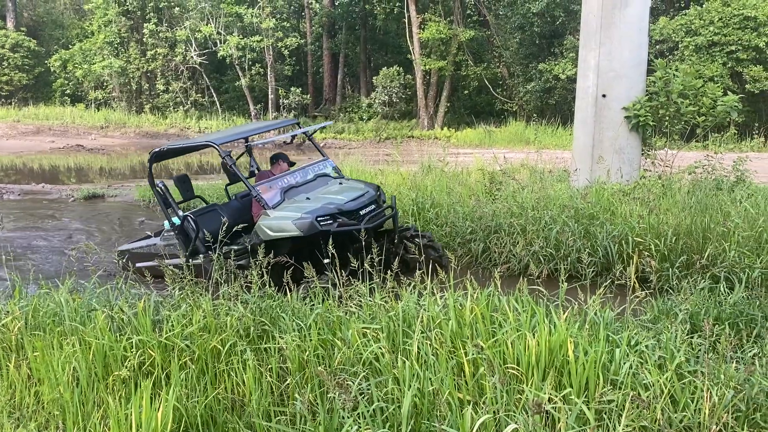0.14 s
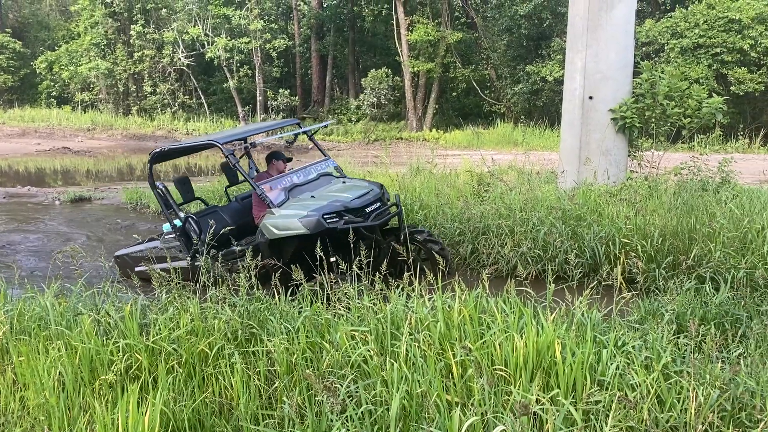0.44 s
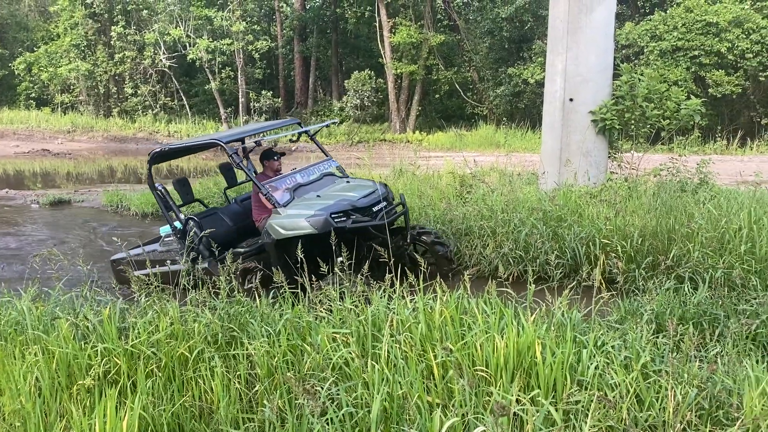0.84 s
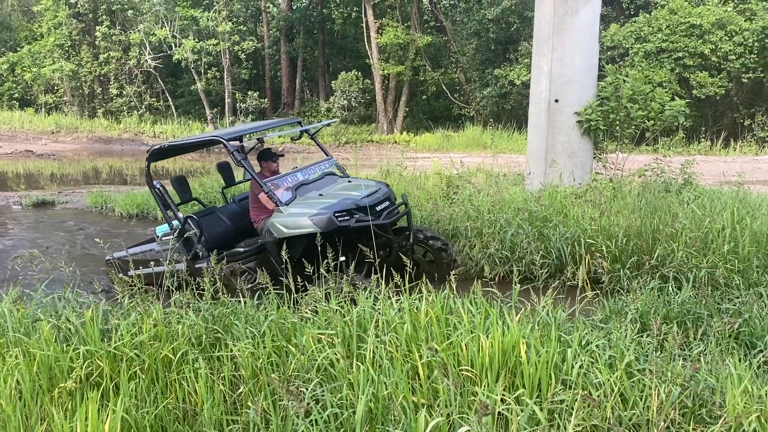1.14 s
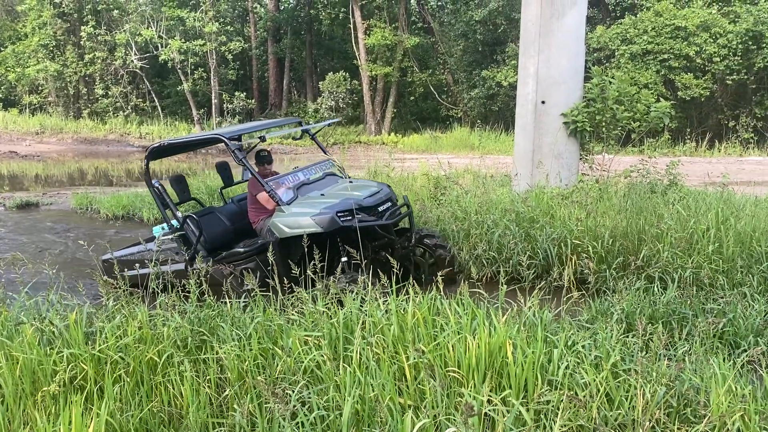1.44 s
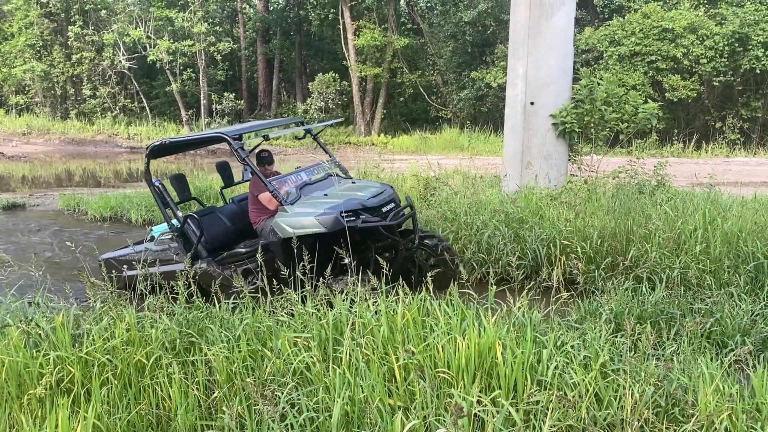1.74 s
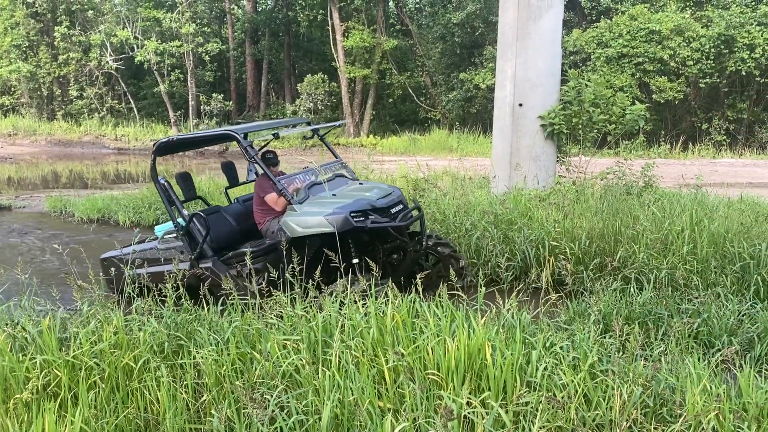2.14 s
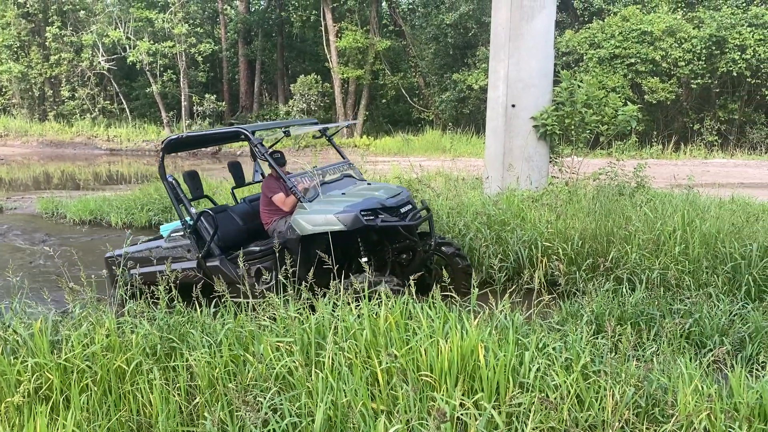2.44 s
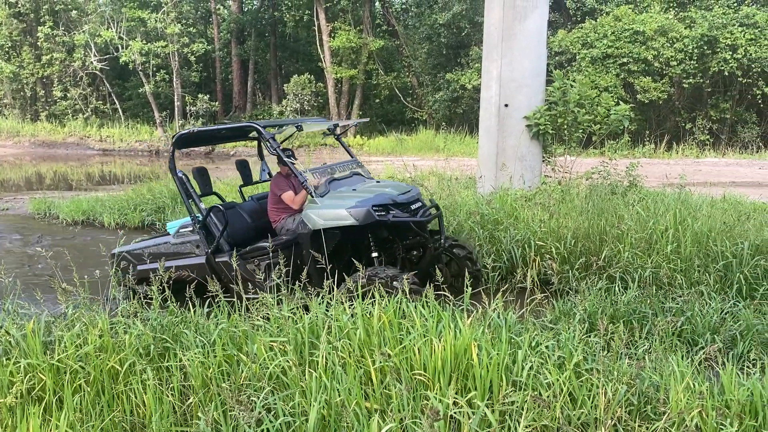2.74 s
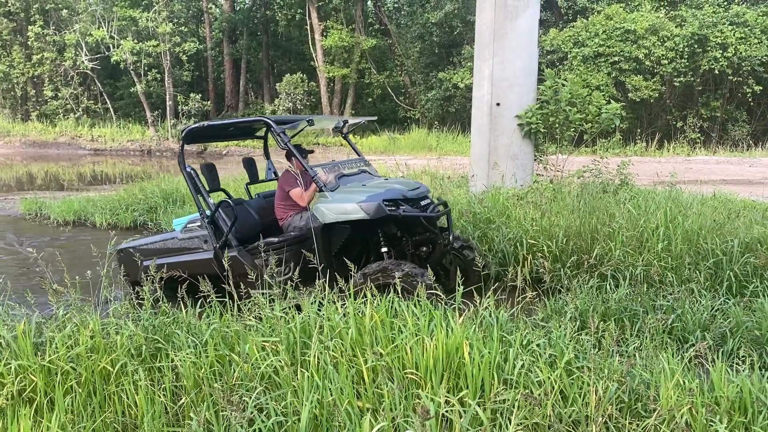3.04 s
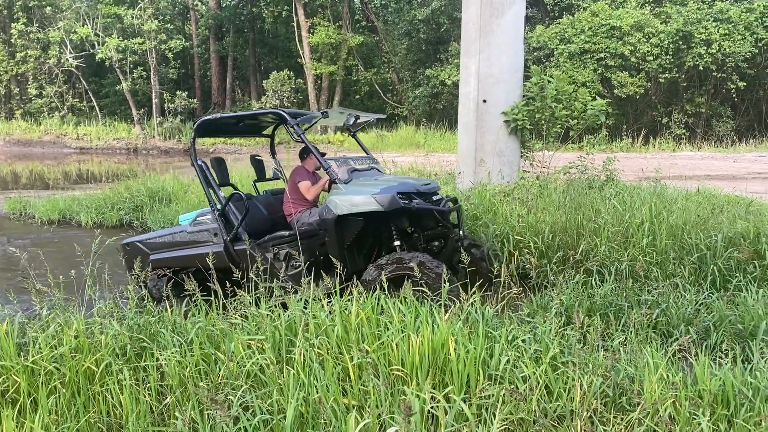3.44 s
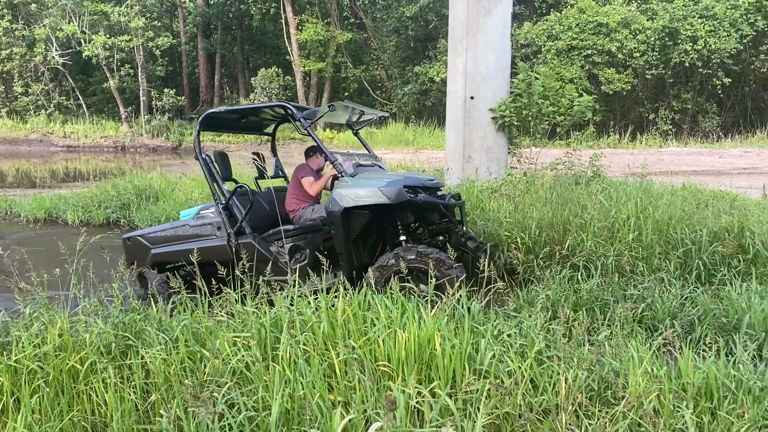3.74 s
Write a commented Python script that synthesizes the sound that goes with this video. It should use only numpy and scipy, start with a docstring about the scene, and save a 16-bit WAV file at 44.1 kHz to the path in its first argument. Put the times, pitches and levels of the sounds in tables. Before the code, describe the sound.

Off-road buggy engine chugging and bubbling through a muddy pool, its exhaust breaking into loud rapid pops

```python
"""Low glugs and gulps come first, over engine hum and churned water: an exhaust bubbling under a muddy pool.
A small utility vehicle climbs out, a few metres from a two-port microphone. Loud pops break free and crowd
together later, while noise and gear whine grow and the frame knocks. Bubbles and knocks are decaying rings,
pops are short bursts of pitch and rasp, the hum is multiples of the firing rate, and the rest is shaped noise."""
import sys
import numpy as np
from scipy import signal
from scipy.fft import rfft, irfft
from scipy.io import wavfile
from scipy.ndimage import uniform_filter1d

SR = 44100
rng = np.random.default_rng(int(sys.argv[2]) if len(sys.argv) > 2 else 0)


def unload_wav(signal):
    """Save mono or channel-first audio to the path in sys.argv[1] as 16-bit WAV at rate SR, clipped to [-1, 1]."""
    wavfile.write(
        sys.argv[1],
        SR,
        np.round(np.clip(np.atleast_2d(signal).T, -1, 1) * 32767).astype(np.int16),
    )


N = 171990  # length in samples

# Engine firing rate. Each row: time [s], firings per second [Hz].
FIRING_RATE = [(0, 28.2), (.6, 29.0), (1.4, 29.55), (1.7, 29.95), (2.3, 29.82), (2.85, 29.12), (3.5, 29.68),
               (3.9, 30.05)]

# Engine and water noise as the vehicle nears. Each row: time [s], roar, rattle and hiss [dB rms].
NOISE_LEVELS = [(0, -33, -41.5, -48), (1.2, -29, -39, -44.5), (2.2, -28, -35, -40.5),
                (2.9, -26.5, -36, -41.5), (3.5, -24.5, -31.5, -37), (3.9, -22.5, -31, -35.5)]
# Edges of roar, rattle and hiss. Each row: low edge [Hz], high edge [Hz].
NOISE_BANDS = [(250, 1600), (1600, 4500), (4500, 16000)]
# Part of each noise band that puffs with the firings. Each row: share at the start, share at the end [0 to 1].
PUFF_SHARES = [(0.033, 0.45), (0.15, 0.21), (0.024, 0.33)]
# Noise colour low in the pool. Each row: frequency [Hz], relative density [dB per Hz].
POOL_COLOUR = [(150, -29), (250, -0.5), (329, -14), (487, -10), (870, -10.5), (1130, -20), (1380, -13.5),
               (1670, -19.5), (2110, -19), (2370, -27.5), (4410, -28), (8000, -31)]
# Noise colour up on the bank. Each row: frequency [Hz], relative density [dB per Hz].
BANK_COLOUR = [(150, -30), (250, -12), (392, -9), (524, -12.5), (597, -14), (731, -12), (1070, -17),
               (1850, -18.5), (2080, -18.5), (2330, -22), (4410, -26.5), (8000, -28)]
# Panel resonances in the noise. Each row: frequency [Hz], width [Hz], boost [dB].
PANEL_RESONANCES = [(2586, 300, 5), (3184, 260, 4), (4670, 490, 5)]
TREBLE_DB_PER_OCTAVE = -9  # above 8 kHz
PUFF_RISE_S, PUFF_FALL_S, PUFF_SIZE_DB = 0.0058, 0.011, 2.5
PATCH_DB, FLICKER_DB = 1, 1  # rms unevenness over time and pitch, and of each band's level

# Low hum of the engine block. Each row: multiple of the firing rate, level [dB rms].
HUM_MULTIPLES = [(1, -30.5), (2, -27), (3, -24.5), (4, -31.5), (5, -33), (6, -36), (7, -36.5)]
# Swell of the third multiple, as one row: time to full level [s], starting offset [dB].
THIRD_SWELL = (2, -6)
# Upper engine tones. Each row: time [s], levels at 9, 15 and 18 times the firing rate [dB rms].
UPPER_TONES = [(0, -38.5, -73, -68), (.5, -34.5, -49, -40), (1.2, -28, -41, -40.5),
               (2.2, -31.5, -36.5, -35.5), (2.7, -37, -35, -34), (3.9, -29.5, -34.5, -42.5)]
HUM_WAVER_DB, TONE_WAVER_DB, TONE_WOBBLE_TURNS = 2.5, 2, .005

# Ring of the valve gear. Each row: pitch [Hz], level [dB], t60 [s], change over the scene [dB per s].
VALVE_RINGS = [(721, -28, 0.077, -0.5), (854, -28.5, 0.069, -7.5), (989, -24.5, 0.083, -12.5),
               (1337, -41.5, 0.11, -2.5), (2564, -37.5, 0.1, -6.5)]
VALVE_SIZE_DB = 0.5  # spread between ticks

# Gear whine. Each row: time [s], level [dB rms over a steady whine].
WHINE_LEVELS = [(0, -51), (1.1, -52.5), (2.6, -41.5), (3.3, -34.5), (3.6, -38.5), (3.8, -33.5)]
# The two whistles. Each row: pitch [Hz], width of each resonator stage [Hz], relative level [dB].
WHISTLES = [(2020, 44, -6.5), (2088, 39, -5)]
WHINE_STEADY, WHINE_KICK_S, WHINE_SIZE_DB = .8, .014, 3  # steady part beside kicks of rms 1

# Knocks in the frame. Each row: start [s], peak [dB], brightness [dB per octave about 1 kHz].
FRAME_KNOCKS = [(0.224, -25, 14), (1.576, -16.5, -20), (1.884, -16, -6), (2.27, -9.5, 0),
                (2.279, -10.5, -12), (2.287, -12, -11), (2.345, -17, -5), (2.824, -16, -3),
                (3.028, -17.5, -12), (3.166, -11.5, -3), (3.502, -12, 0), (3.676, -17, -1),
                (3.771, -11.5, -4)]
# Ringing modes of the frame. Each row: pitch [Hz], relative level [dB], t60 [s].
FRAME_MODES = [(690, 8.5, 0.036), (759, 5.5, 0.04), (1010, 16.5, 0.0089), (1353, 8, 0.026),
               (1418, 1.5, 0.029), (1620, 9.5, 0.016), (2127, 1.5, 0.064)]

# Exhaust glugging under water. Each row: time [s], level [dB rms].
GLUG_LEVELS = [(0, -28), (2.3, -26), (3.9, -33)]
# Big gulps of gas. Each row: start [s], peak [dB], starting pitch [Hz].
BIG_GULPS = [(0.114, -11.5, 76), (0.281, -35, 75), (0.463, -10, 72.4), (0.518, -14, 99),
             (0.619, -11, 107.5), (0.765, -14, 114.7), (0.864, -12, 102), (1.045, -18, 79),
             (1.24, -14, 114), (1.393, -12, 89), (1.508, -15, 101), (1.656, -11, 77.2),
             (1.907, -13.5, 116.6), (1.978, -21, 96.9), (2.149, -13, 76.5)]
GLUG_HZ, GLUG_SPREAD, GLUG_SIZE_DB = 85.2, 0.3, 2  # pitch spread in natural-log units
GLUG_RISE_S, GLUG_T60_S, GLUG_GLIDE_PER_S = 0.013, 0.14, 3
GULP_RISE_S, GULP_T60_S, GULP_GLIDE_PER_S = .013, .15, 6

# Small exhaust pops. Each row: time [s], level [dB rms].
SMALL_POP_LEVELS = [(0, -37), (.6, -32.5), (1.5, -35.5), (2.1, -34.5), (2.6, -29), (3.9, -26)]
# Loud exhaust pops. Each row: time before POP_LAG_S [s], approximate peak [dB], pitch [Hz].
LOUD_POPS = [(0.898, -12, 184), (1.133, -15, 186), (1.445, -11, 204), (1.474, -10.5, 323),
             (1.506, -13, 358), (1.542, -12, 173), (1.673, -10.5, 178), (1.708, -9.5, 188),
             (2.042, -18, 164), (2.243, -13, 276), (2.276, -12, 283), (2.31, -12, 220), (2.343, -10.5, 355),
             (2.648, -13.5, 189), (2.715, -12.5, 177), (2.75, -10.5, 179), (2.817, -15, 226),
             (2.854, -11, 175), (2.887, -8.5, 296), (2.918, -11, 169), (2.956, -9.5, 275),
             (2.993, -13, 150), (3.059, -14, 203), (3.125, -7.5, 189), (3.161, -10.5, 210),
             (3.23, -10.5, 161.5), (3.265, -6.5, 175), (3.334, -7.5, 169.5), (3.365, -11.5, 170),
             (3.399, -8.5, 161), (3.468, -5, 183), (3.501, -5, 406), (3.532, -8, 312), (3.569, -7.5, 227),
             (3.633, -15.5, 187), (3.671, -10.5, 180), (3.734, -10.5, 290), (3.769, -8, 176),
             (3.802, -14, 158), (3.836, -6, 180)]
# The rasp grows once the pops are clear of the water, as one row: early and final share of POP_RASP.
RASP_GROWTH = (.1, .55)
POP_HZ = (138, 248)  # centre at start and end: pitch rises as the pipe nears the surface
POP_SPREAD, POP_SIZE_DB = .3, 2  # pitch spread in natural-log units
POP_CYCLES, POP_GLIDE, POP_LEAN = .7, -0.15, 1.3  # cycles per envelope width, pitch slide, phase [rad]
POP_LAG_S, POP_RASP = 0.005, 0.55

# Likeness of left and right ports. Each row: frequency [Hz], share [0 to 1].
PORT_LIKENESS = [(60, 0.99), (1000, 0.99), (2000, 0.97), (4000, 0.3), (8000, 1), (15000, 1)]
# Phase by which left leads right. Each row: frequency [Hz], lead [rad].
PORT_LEAD = [(0, 0), (2240, 1.4), (5680, -.5), (7240, 0), (8440, -2.8), (9560, -3.4), (10500, -6),
             (11600, -6.4), (12500, -9.1), (13700, -9.5), (14600, -12.3), (16600, -12.8)]
# Level of left minus right. Each row: frequency [Hz], difference [dB].
PORT_TILT = [(60, -.8), (700, -1), (1800, -3), (2800, 3.5), (4200, 4.5), (9000, 0)]
LOW_CUT_HZ, EDGE_HZ = 55.8, 15850


def amp(db):
    """Decibels to amplitude."""
    return 10 ** (np.asarray(db) / 20)


def evened(x):
    """Scale to rms 1."""
    return x / np.sqrt(np.mean(x ** 2) + 1e-20)


def read(points, hz):
    """Read a frequency table along a logarithmic axis."""
    f, value = np.transpose(points)
    return np.interp(np.log(hz + 1), np.log(f + 1), value)


def curve(table, axis):
    """One column of a time table at every sample."""
    return np.interp(np.arange(N) / SR, np.transpose(table)[0], np.transpose(table)[axis])


def add(mix, s, sound):
    """Lay a sound into the mix from s seconds."""
    part = mix[max(round(s * SR), 0):][:len(sound)]
    part += sound[:len(part)]


def waver(rate_hz):
    """Slow chance of rms 1: twenty sines from 0.5 Hz up to rate_hz."""
    t = np.arange(0, N + 64, 64) / SR
    rates = np.geomspace(.5, rate_hz, num=20)
    slow = sum(np.sin(2 * np.pi * (f * t + rng.random())) for f in rates)
    return np.interp(np.arange(N), t * SR, evened(slow))


def firing_train(firings, spread_db):
    """One impulse per firing, of uneven strength."""
    train = np.zeros(N)
    train[firings] = amp(spread_db * rng.standard_normal(len(firings)))
    return train


def noise(lo_hz, hi_hz):
    """Patchy noise whose colour turns during the climb: row 0 is common to both ports, row 1 is stray."""
    frames, hz = N // 256 + 5, np.fft.rfftfreq(1024, 1 / SR)
    a, b, c, d, patches = rng.standard_normal((frames, 513, 5)).T
    patches = uniform_filter1d(uniform_filter1d(patches, size=8, axis=0), size=8, axis=1)
    climb = np.linspace(0, 1, frames)
    pool_db = read(POOL_COLOUR, np.minimum(hz, 8000))
    bank_db = read(BANK_COLOUR, np.minimum(hz, 8000))
    colour_db = np.outer(pool_db, 1 - climb) + np.outer(bank_db, climb)
    treble_db = TREBLE_DB_PER_OCTAVE * np.log2(np.maximum(hz, 8000) / 8000)
    panel_db = sum(db / (1 + (2 * (hz - f) / w) ** 2) for f, w, db in PANEL_RESONANCES)
    in_band = (hz >= lo_hz) & (hz < hi_hz)
    gain = amp(colour_db + (treble_db + panel_db)[:, None]) * in_band[:, None]
    # every frame carries equal power before the patches
    gain = gain / np.linalg.norm(gain, axis=0) * amp(PATCH_DB * evened(patches))
    spectra = np.array([a + 1j * b, c + 1j * d]) * gain
    return evened(signal.istft(spectra, nperseg=1024, noverlap=768)[1][:, :N])


def roar(firings):
    """Three bands of engine and water noise, partly puffing with each firing."""
    t, out = np.arange(-300, 2500) / SR, 0
    puff = np.where(t < 0, np.exp(t / PUFF_RISE_S), np.exp(-t / PUFF_FALL_S))
    shared = rng.standard_normal(len(firings))
    for k, (lo, hi) in enumerate(NOISE_BANDS):
        train = np.zeros(N)
        size = 1.04 * shared + 0.18 * rng.standard_normal(len(firings))
        train[firings] = amp(PUFF_SIZE_DB * size)
        # each puff peaks 100 samples ahead of its firing
        gate = evened(signal.oaconvolve(train, puff)[400:N + 400])
        share = np.clip(np.linspace(*PUFF_SHARES[k], N), 0, 1)
        level = amp(curve(NOISE_LEVELS, axis=k + 1) + FLICKER_DB * waver(33))
        out = out + level * evened((1 - share + share * gate) * noise(lo, hi))
    return out


def hum(turns):
    """Multiples of the firing rate wavering in level; the upper tones wobble in phase too."""
    swell_s, swell_db = THIRD_SWELL
    early_db = np.interp(np.arange(N) / SR, (0, swell_s), (swell_db, 0))
    out = 0
    for k, db in HUM_MULTIPLES:
        level = amp(db + (k == 3) * early_db + HUM_WAVER_DB * waver(7.3))
        out = out + level * np.cos(2 * np.pi * k * turns + k * k)
    for column, k in enumerate((9, 15, 18), start=1):
        level = amp(curve(UPPER_TONES, axis=column) + TONE_WAVER_DB * waver(10))
        out = out + level * np.cos(2 * np.pi * k * (turns + TONE_WOBBLE_TURNS * waver(25)))
    return np.sqrt(2) * out  # cosine peak for unit rms


def valves(firings):
    """The same short metallic ring at every firing, which stacks clean harmonics."""
    t, out = np.arange(5000) / SR, 0
    train = firing_train(firings, VALVE_SIZE_DB)
    for hz, db, t60, fade_db in VALVE_RINGS:
        ring = amp(db - 60 * t / t60) * np.sin(2 * np.pi * hz * t) * (1 - np.exp(-t / 0.0018))
        out = out + signal.oaconvolve(train, ring)[:N] * amp(fade_db * np.arange(N) / SR)
    return out


def whine(firings):
    """Two fuzzy gear whistles, narrow noise about a pitch, kicked unevenly by each firing."""
    t = np.arange(N) / SR
    kick = (1 - np.exp(-t[:3000] / 0.002)) * np.exp(-t[:3000] / WHINE_KICK_S)
    kicks = evened(signal.oaconvolve(firing_train(firings, WHINE_SIZE_DB), kick)[:N])
    out = 0
    for hz, width, db in WHISTLES:
        r = np.exp(-np.pi * width / SR)
        grain = rng.standard_normal(N) + 1j * rng.standard_normal(N)
        slow = signal.lfilter([1], [1, -2 * r, r * r], grain)  # two equal stages
        out = out + amp(db) * evened((slow * np.exp(2j * np.pi * hz * t)).real)
    return amp(curve(WHINE_LEVELS, axis=1)) * evened(out * (WHINE_STEADY + kicks))


def knocks():
    """Short dull rings of the frame: decaying modes with a soft onset."""
    t, out = np.arange(6000) / SR, np.zeros(N)
    for s, db, bright_db in FRAME_KNOCKS:
        ring = 0
        for hz, mode_db, t60 in FRAME_MODES:
            level_db = mode_db + bright_db * np.log2(hz / 1000) + 2 * rng.standard_normal()
            ring = ring + amp(level_db - 60 * t / t60) * np.sin(2 * np.pi * hz * t + 6 * rng.random())
        ring = ring * (1 - np.exp(-(t / 0.00075) ** 2))
        add(out, s, amp(db) * ring / abs(ring).max())
    return out


def glug(hz, rise_s, t60, glide_per_s):
    """A bubble that rings low and rises in pitch while it decays."""
    t = np.arange(6000) / SR
    turns = np.cumsum(hz * (1 + glide_per_s * t)) / SR
    return np.sin(2 * np.pi * turns) * (1 - np.exp(-(t / rise_s) ** 2)) * amp(-60 * t / t60)


def glugs(firings):
    """Each firing blows a bubble under water, and now and then a big one gulps."""
    small, big = np.zeros(N), np.zeros(N)
    for s, (size, pitch, late) in zip(firings / SR, rng.standard_normal((len(firings), 3))):
        hz = GLUG_HZ * np.exp(GLUG_SPREAD * np.clip(pitch, -2, 2))
        ring = glug(hz, GLUG_RISE_S, GLUG_T60_S, GLUG_GLIDE_PER_S)
        add(small, s - .01 + 0.0049 * late, amp(GLUG_SIZE_DB * size) * ring)
    for s, db, hz in BIG_GULPS:
        ring = glug(hz, GULP_RISE_S, GULP_T60_S, GULP_GLIDE_PER_S)
        add(big, s, amp(db) * ring / abs(ring).max())
    # hold the small bubbles to an even level over 4000 samples
    steady = small / np.sqrt(uniform_filter1d(small ** 2, size=4000) + 1e-9)
    return amp(curve(GLUG_LEVELS, axis=1)) * evened(steady) + big


def pop(s, hz):
    """A gas bubble bursts: a cycle or two sliding in pitch, with a dull rasp; also gives its lead in s."""
    u = np.arange(-2.5, 4, hz / SR / POP_CYCLES)  # time in envelope widths
    shape = np.exp(-u ** 2 * np.where(u < 0, .6, .5))
    cycles = POP_CYCLES * (u + POP_GLIDE * u ** 2 / 4)
    tone = -np.cos(2 * np.pi * cycles - POP_LEAN)
    rasp = evened(signal.oaconvolve(rng.standard_normal(len(u)), np.hanning(M=70), "same"))
    rasp_level = POP_RASP * np.interp(s, (2.6, N / SR), RASP_GROWTH)
    return shape * (tone + rasp_level * rasp), 2.315 * POP_CYCLES / hz


def exhaust(firings):
    """A small gas pop at each firing, left out where one of the loud pops falls."""
    small, loud = np.zeros(N), np.zeros(N)
    loud_s = np.transpose(LOUD_POPS)[0] + POP_LAG_S
    for s, (size, pitch, late) in zip(firings / SR, rng.standard_normal((len(firings), 3))):
        centre_hz = np.interp(s, (0, N / SR), POP_HZ)
        sound, lead = pop(s, centre_hz * np.exp(POP_SPREAD * np.clip(pitch, -2, 2)))
        if np.min(abs(loud_s - s)) > .015:
            add(small, s - lead + 0.00214 * late, amp(POP_SIZE_DB * size) * sound)
    for s, db, hz in LOUD_POPS:
        sound, lead = pop(s, hz)
        add(loud, s + POP_LAG_S - lead, amp(db) * sound)
    return amp(curve(SMALL_POP_LEVELS, axis=1)) * evened(small) + loud


def scene():
    """All sources reach two close ports, with likeness, phase and level set by frequency."""
    turns = np.cumsum(curve(FIRING_RATE, axis=1)) / SR
    firings = np.flatnonzero(np.diff(np.floor(turns)))
    noisy = roar(firings)
    low = hum(turns) + exhaust(firings) + glugs(firings)
    common = noisy[0] + low + whine(firings) + knocks() + valves(firings)
    stray = noisy[1] + np.roll(low, 4000)  # a shifted copy stands for the unlike part
    hz = np.fft.rfftfreq(N, 1 / SR)
    same = np.clip(read(PORT_LIKENESS, hz), 0, 1)
    lead = np.interp(hz, *np.transpose(PORT_LEAD))
    # half of the tilt and lead goes to each port, in opposite directions
    half = amp(read(PORT_TILT, hz) / 2) * np.exp(.5j * lead)
    alike = np.sqrt((1 + same) / 2) * rfft(common)
    unlike = np.sqrt((1 - same) / 2) * rfft(stray)
    return irfft(np.array([(alike + unlike) * half, (alike - unlike) / half]), N)


def record(dry):
    """Bass roll-off of the microphone, then the band limit."""
    bass_cut = signal.butter(N=4, Wn=LOW_CUT_HZ, btype="high", fs=SR, output="sos")
    band_limit = signal.firwin(511, EDGE_HZ, window=("kaiser", 9), fs=SR)
    return signal.oaconvolve(signal.sosfilt(bass_cut, dry), band_limit[None], "same")


dry = scene()
out = record(dry)
unload_wav(out)
```